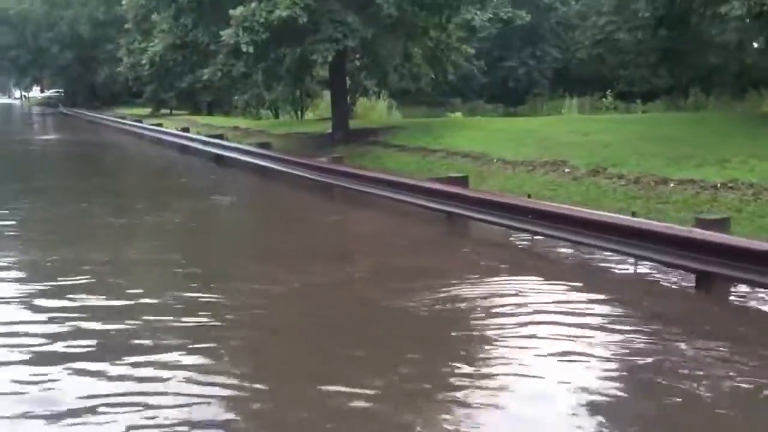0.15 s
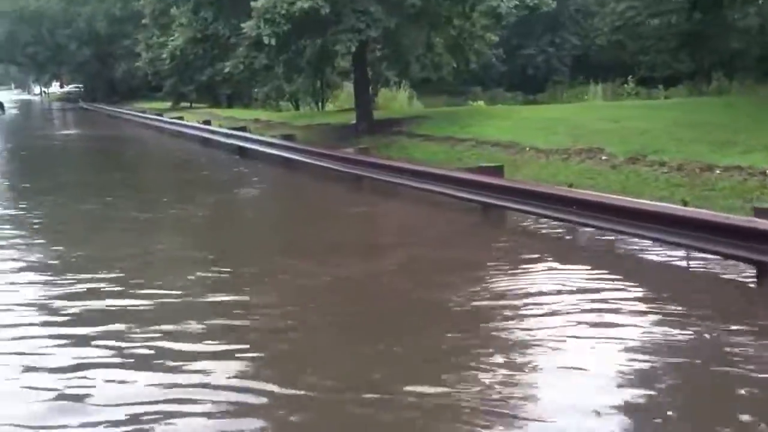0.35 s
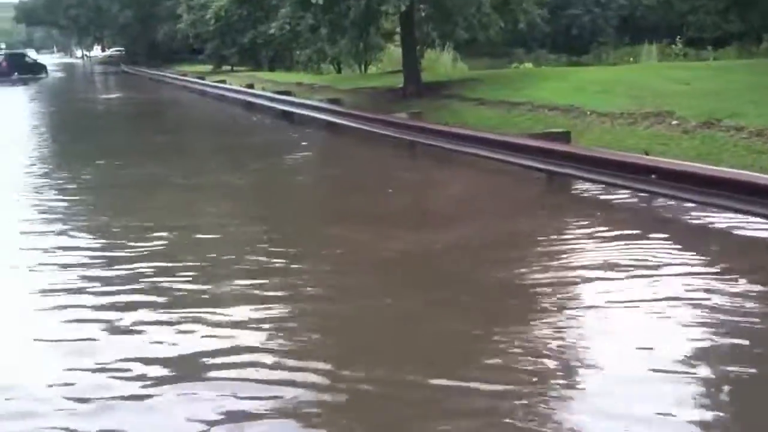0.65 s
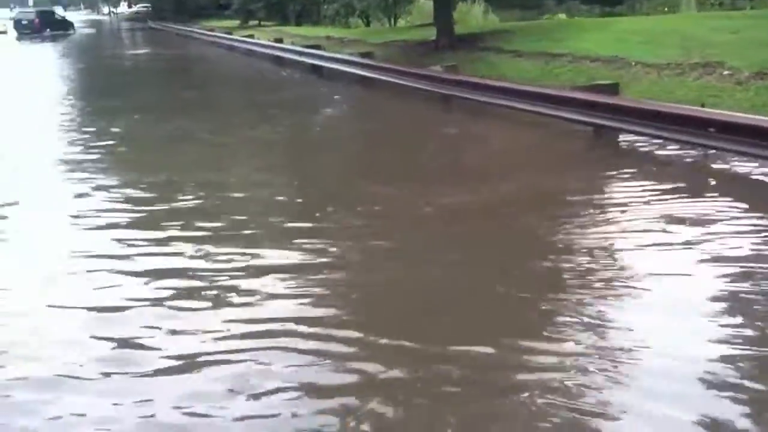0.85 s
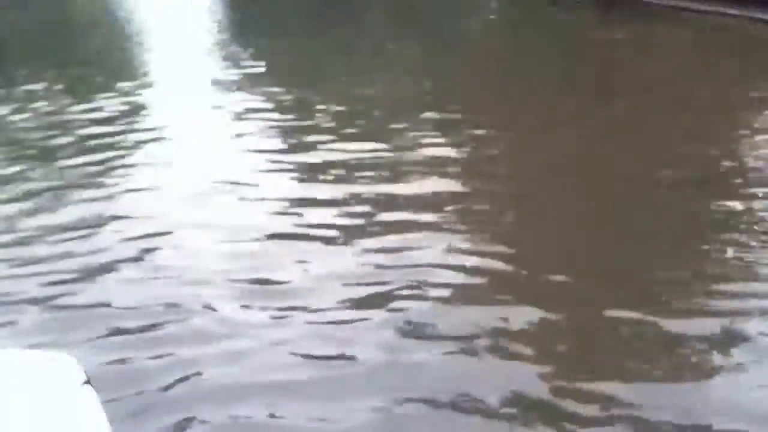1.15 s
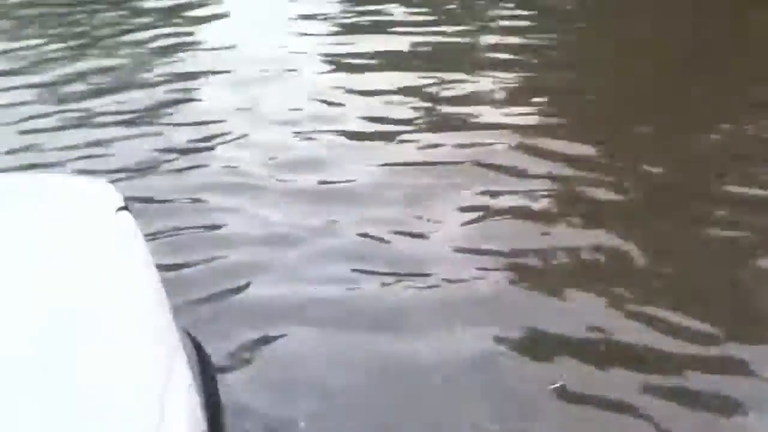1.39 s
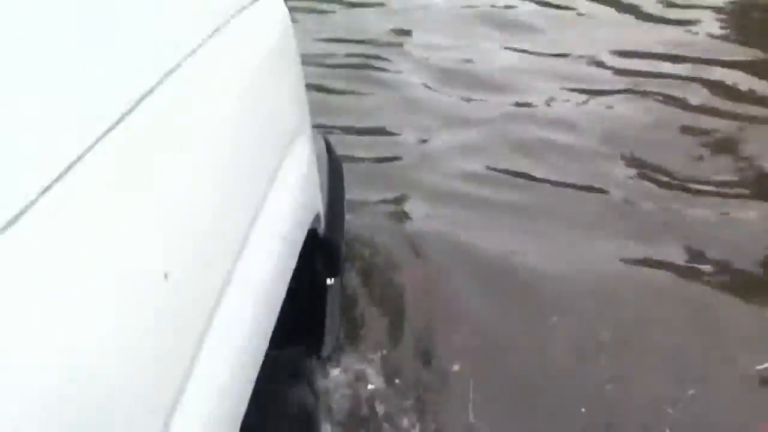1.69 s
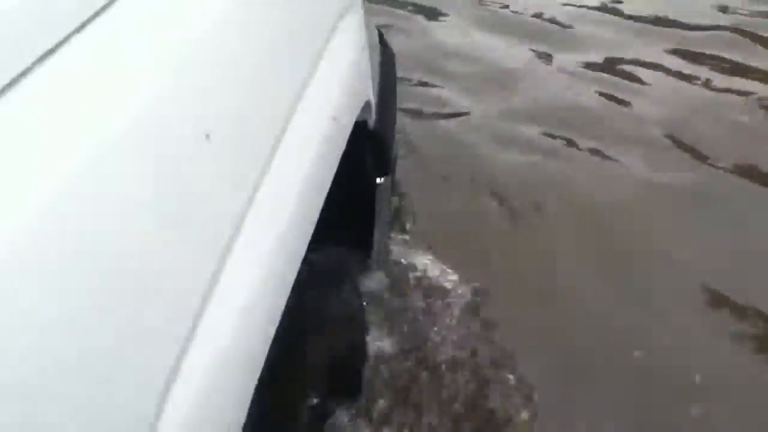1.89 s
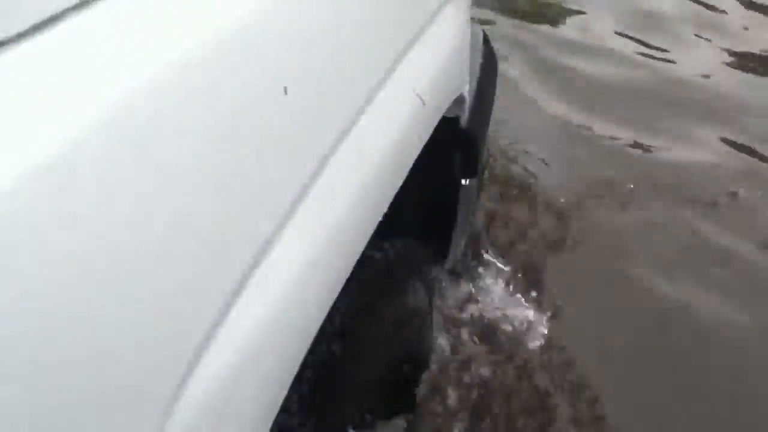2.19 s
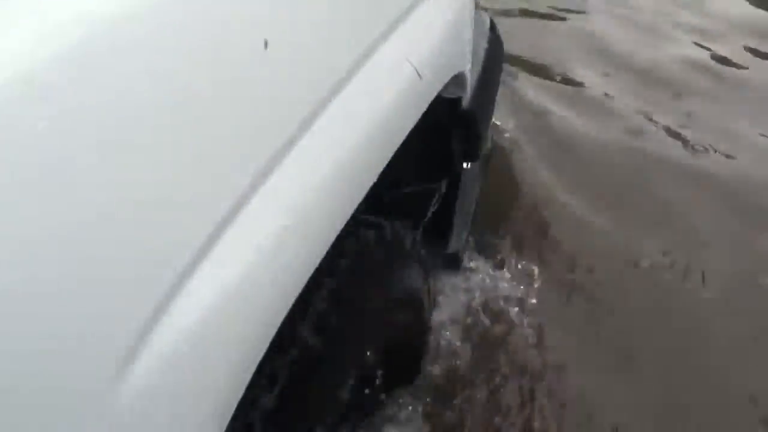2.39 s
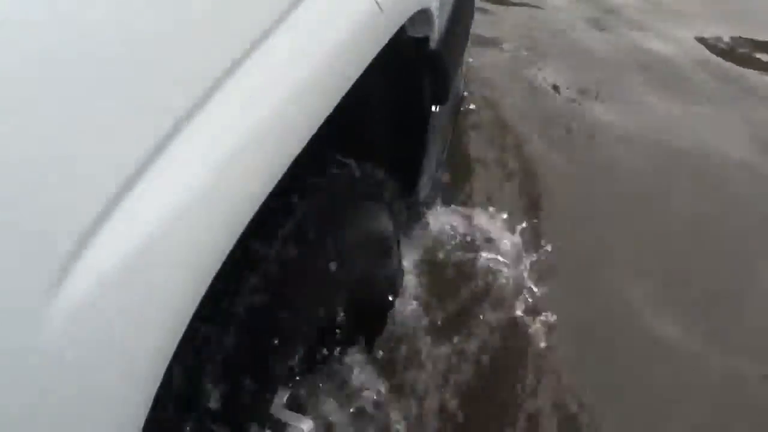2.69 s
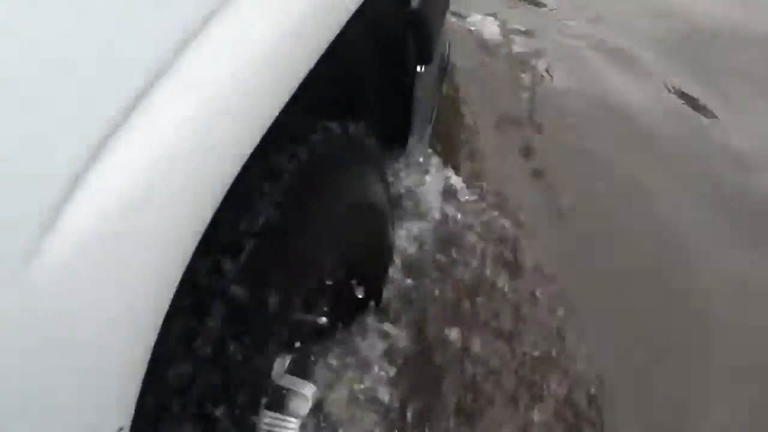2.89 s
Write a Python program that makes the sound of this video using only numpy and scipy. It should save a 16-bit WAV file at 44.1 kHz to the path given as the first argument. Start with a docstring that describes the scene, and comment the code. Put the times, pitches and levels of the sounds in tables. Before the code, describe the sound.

Water rushes softly past a car wading through floodwater, with fine crackling spray, small bubbles and a low, uneven engine drone near idle. Between 0.6 and 1 s the engine picks up; the rush then swells steadily, loudest after 2 s. Crisp drop smacks cluster near 1.3, 2.1 and 2.7 s, bubbles plop throughout, and the engine climbs again after 2.5 s. Close, dry, outdoors, treble-heavy small microphone.

```python
"""A car rolls slowly through deep floodwater, heard from its side window by a small microphone.
At first the engine, a stack of sines, drones just above idle; the bow wave, bands of noise, rushes softly.
Spray crackles as ringing clicks; for about two seconds small bubbles ring as rising sines.
Drops smack as noise bursts and large bubbles plop all along. The engine speeds up between 0.6 and 1 s.
The rush swells from then on, and the engine speeds up again after 2.5 s."""
import sys
import numpy as np
from scipy import signal
from scipy.io import wavfile

SR = 44100
rng = np.random.default_rng(int(sys.argv[2]) if len(sys.argv) > 2 else 0)


def digitize_waveform(pressure):
    """Quantize a signal to 16-bit integers and store it at the path in sys.argv[1].

    Rows of a 2-D input are taken as channels; values are limited to [-1, 1].
    """
    field = np.atleast_2d(pressure).T
    bounded = np.clip(field, -1, 1)
    quanta = np.round(bounded * 32767).astype(np.int16)
    wavfile.write(sys.argv[1], SR, quanta)


def invert_db(level):
    """Linear amplitude ratio for a level in decibels (20 dB per decade), elementwise."""
    return 10 ** (np.asarray(level, dtype=float) / 20)


N = 134505

# how the engine runs: time_s, working_cycles_per_s, load_db, throttle (0 idling, 1 pulling, 2 revving)
ENGINE_RUN = [(0, 5.76, -3.6, 0), (.19, 5.863, -3.6, 0), (.38, 5.9, -3.7, 0), (.57, 5.78, -3.8, 0),
              (.76, 6.034, -2.8, .3), (.95, 6.275, -1.0, 1), (1.14, 6.257, -.8, 1), (1.33, 6.265, -.5, 1),
              (1.52, 6.319, -.2, 1), (1.71, 6.425, 0, 1), (1.9, 6.346, .2, 1), (2.09, 6.396, .4, 1),
              (2.28, 6.47, .6, 1), (2.47, 6.526, .9, 1.2), (2.66, 6.795, 1.5, 2), (2.85, 6.985, 2.7, 2),
              (3.04, 7.012, 3.9, 2)]
# strength of each multiple of the cycle, from uneven firing: multiple, idling_db, pulling_db, revving_db
FIRING_MULTIPLES = [(12, -10.5, -2.5, .5), (15, -2.5, -11, -10), (17, -9, -3, 5), (18, 12.6, 12.6, 10.5),
                    (19, -2, -4.5, -4), (20, -6, -8, -6), (21, 0, 6, 5.5), (22, -1, -4, -2.5),
                    (23, 10.8, 11, 10), (24, 5, 0, 0), (25, 2, 3.5, 4), (26, 2.5, 5, -5), (27, 0, 2.5, 6),
                    (28, 1, .5, -5), (29, -5, -1, 2), (30, 3, -3.5, -5), (31, -10, -11, -3.5),
                    (32, -13, 1.5, 2.5), (33, 1.5, 3.5, -1), (34, 0, -4, -10), (35, -10, -6, -11),
                    (36, 4, -5, -6), (37, -10, -5.8, -5), (39, .4, .4, -3), (41, 1.7, 1.7, 0),
                    (43, 4.4, 4.4, 4.4)]
# seven uneven exhaust thumps in each cycle, which set how the multiples line up:
# idling_place (share of the cycle), idling_strength (ratio), loaded_place (share), loaded_strength (ratio)
EXHAUST_THUMPS = [(.0135, .53, .0805, .98), (.1275, .81, .169, .76), (.3651, .9, .4028, .52),
                  (.5305, .9, .7112, .97), (.5545, .4, .7363, .68), (.7143, .7, .879, .61),
                  (.8935, .61, .9703, .71)]
# response of exhaust and car body: pitch_hz, level_db
EXHAUST_RESPONSE = [(65, -51), (85, -62), (105, -56), (120, -64), (132, -67.5), (144, -50), (160, -48),
                    (180, -55.5), (195, -45), (208, -45.5), (220, -55), (235, -60.5), (300, -70)]
WAVER_DB, WAVER_RAD, WAVER_HZ = .7, .1, 1.5  # engine waver: level, phase, speed

# drops that smack close by: start_s, level_db, centre_hz, fade_s (time to fall 60 dB)
DROP_SMACKS = [(.1101, -49, 8000, .02), (.12, -35.5, 7400, .012), (.129, -40, 8500, .015),
               (.134, -37.5, 4900, .012), (0.2688, -33.5, 8500, .008), (.369, -44, 8500, .008),
               (0.376, -34, 9500, .008), (0.4504, -37, 8500, .008), (.7935, -34.5, 9000, 0.0087),
               (0.8348, -34, 8500, .008), (1.1892, -31, 9800, 0.0095), (1.288, -40, 8500, .005),
               (1.2937, -28.5, 9050, 0.012), (1.362, -27, 9000, .004), (1.3633, -37, 8500, 0.011),
               (1.3717, -32, 5940, 0.021), (1.398, -30, 8500, 0.0046), (1.7594, -30, 8500, 0.0088),
               (1.784, -30, 9500, .008), (2.0168, -34, 8500, .015), (2.067, -30, 8000, .012),
               (2.1082, -28, 9000, 0.0064), (2.114, -33, 9500, .006), (2.119, -30, 8500, 0.0064),
               (2.1355, -28, 8500, 0.0094), (2.1415, -32, 10500, .008), (2.147, -40, 8000, .008),
               (2.2814, -36, 9500, .008), (2.3334, -29.5, 8500, 0.011), (2.605, -29, 8300, .008),
               (2.613, -30, 9000, .01), (2.653, -32, 8000, .006), (2.667, -21.5, 8900, .009),
               (2.6943, -31, 7800, .006), (2.742, -31, 8500, .008)]
DROP_SPAN = 1.42  # ratio from the centre to either edge of a smack's band
# large bubbles that plop: start_s, level_db, pitch_hz (at the start)
LARGE_BUBBLES = [(0.11, -40, 2230), (.315, -46, 638), (0.953, -46, 1370), (.968, -45, 1510),
                 (1.155, -45.5, 704), (1.376, -42.5, 802), (1.957, -39, 693), (2.096, -44, 692),
                 (1.962, -38.5, 498), (2.015, -44, 1470), (2.169, -40, 2570), (2.246, -38.5, 1780),
                 (2.33, -40, 2650), (2.412, -40, 398), (2.428, -37, 3850), (1.866, -45, 3600),
                 (2.23, -40.5, 3400), (2.63, -41.5, 503), (2.746, -35, 421), (2.805, -47, 2600),
                 (2.981, -38.5, 1196)]
PLOP_CYCLES = 52.0  # length of a plop, in cycles of its starting pitch

# churn of the water at the wheel: time_s, rush_db, treble_db (above or below the rush)
WHEEL_CHURN = [(0, -52, 2), (.2, -56, 3), (.5, -54, 2.5), (.8, -53.5, 1), (1.1, -51.5, 1.5),
               (1.35, -50.5, 1), (1.6, -49.5, 2.5), (1.85, -47.5, 1), (2.05, -45.5, 1), (2.2, -45.5, -1.5),
               (2.35, -44.5, -1), (2.5, -45, -1), (2.68, -43, -4), (2.85, -45.5, 2), (3.05, -42.5, -2.5)]
SPRAY_PER_S, SPRAY_DB, SPRAY_SIZES_DB = 2500, -8, 5  # rate before clumping, level, spread of sizes
SPRAY_CLUMP_DB, SPRAY_CYCLES = 5, 2.94  # how far the rate swings, length of each ring
BUBBLES_PER_S, BUBBLES_DB, BUBBLE_CYCLES = 500, -6.5, 21.6
BUBBLE_RISE = 0.2  # a bubble ends higher in pitch by twice this share

# tone of the bow wave's rush: pitch_hz, level_db (for equal widths in Hz)
RUSH_TONE = [(25, -34), (55, -25), (90, -25), (150, 3), (200, -2), (240, -6.5), (280, -8.5), (400, -8.5),
             (650, -10), (1060, -14), (1660, -18.5), (2350, -19), (3300, -24.5), (6000, -24), (9000, -27.5),
             (15000, -33.5)]
# steady noise of fan, belts and road under the bonnet: pitch_hz, level_db (same scale, rush at 0 dB)
BAY_TONE = [(25, -80), (55, -70), (90, -56), (140, -52), (200, -49.5), (250, -49.5), (320, -54.5),
            (450, -76), (900, -82), (2300, -74), (4000, -77.5), (15000, -106)]
RUSH_DB, TREBLE_FROM_HZ = 22, 8700

MIC_PEAK_HZ, MIC_WIDTH_HZ, MIC_PEAK_DB, MIC_TOP_HZ = 8490, 1440, 12.5, 11300


def rms_one(x):
    """Scales a sound to rms 1."""
    return x / np.sqrt(np.mean(x ** 2) + 1e-20)


def in_time(rows):
    """Reads the columns of a time table at every sample."""
    s, *columns = np.transpose(rows)
    return [np.interp(np.arange(N) / SR, s, column) for column in columns]


def at_hz(points, hz):
    """Reads a spectrum on a log-frequency axis."""
    point_hz, point_db = np.transpose(points)
    return np.interp(np.log(hz), np.log(point_hz), point_db)


def drift(hz):
    """Slow random wandering with spread 1: noise smoothed above hz, drawn at every 40th sample."""
    r = np.exp(-80 * np.pi * hz / SR)
    noise = rng.standard_normal(N // 40 + 2002)
    slow = signal.lfilter([1], [1, -2 * r, r * r], noise)[2000:]
    return np.interp(np.arange(N) / 40, np.arange(len(slow)), rms_one(slow - slow.mean()))


def ring(clicks, hz, t60):
    """Each unit click sets off a sine of height 1 that falls 60 dB in t60 seconds."""
    r = invert_db(-60 / (t60 * SR))
    w = 2 * np.pi * hz / SR
    return signal.lfilter([0, np.sin(w)], [1, -2 * r * np.cos(w), r * r], clicks + 1e-18)


def add(out, s, sound):
    """Mixes a short sound in at time s."""
    i = int(s * SR)
    out[i:i + len(sound)] += sound[:N - i]


def bubble(hz, cycles):
    """A bubble sings a soft-edged sine that rises in pitch while it dies."""
    turns = np.arange(int(cycles / hz * SR)) * hz / SR
    onset = 1 - np.exp(-turns / 0.24)
    fade = invert_db(-60 * turns / cycles)
    return onset * fade * np.sin(2 * np.pi * turns * (1 + BUBBLE_RISE * turns / cycles))


def engine():
    """Uneven firing makes sines at multiples of the cycle; the exhaust colours them and they waver."""
    rate, load_db, throttle = in_time(ENGINE_RUN)
    cycle = 2 * np.pi * np.cumsum(rate) / SR
    loaded = np.minimum(throttle, 1)
    columns = np.transpose(EXHAUST_THUMPS)
    places, strengths = columns[0::2], columns[1::2]
    out = 0
    for k, *state_db in FIRING_MULTIPLES:
        # the thumps' phase at this multiple, turning from idling to pulling the short way round
        idling, pulling = np.angle(np.sum(strengths * np.exp(-2j * np.pi * k * places), axis=1))
        lined_up = idling + loaded * np.angle(np.exp(1j * (pulling - idling)))
        firing_db = np.interp(throttle, range(3), state_db) + load_db
        level = invert_db(firing_db + at_hz(EXHAUST_RESPONSE, k * rate) + WAVER_DB * drift(WAVER_HZ))
        phase = k * cycle + lined_up + WAVER_RAD * drift(WAVER_HZ)
        out = out - np.sqrt(2) * level * np.sin(phase)
    return out


def drops():
    """Each smack is a burst of noise around its own pitch that swells at once and dies in milliseconds."""
    out, age = np.zeros(N), np.arange(SR // 40) / SR
    noises = rng.standard_normal((len(DROP_SMACKS), len(age)))
    for (s, db, hz, t60), noise in zip(DROP_SMACKS, noises):
        envelope = invert_db(-60 * age / t60) * (1 - np.exp(-age / .0002))
        burst = envelope * np.tanh(3 * noise)
        band = signal.butter(2, [hz / DROP_SPAN, hz * DROP_SPAN], "band", fs=SR, output="sos")
        burst = signal.sosfilt(band, burst)
        # set lower here, as the microphone lifts this treble
        add(out, s, invert_db(db - MIC_PEAK_DB + 3) * burst / np.abs(burst).max())
    return out


def plops():
    """Single large bubbles ring for more cycles than the small ones."""
    out = np.zeros(N)
    for s, db, hz in LARGE_BUBBLES:
        add(out, s, invert_db(db) * bubble(hz, PLOP_CYCLES))
    return out


def spray():
    """Clumps of tiny droplets burst as clicks that ring for a few cycles."""
    sizes = invert_db(SPRAY_SIZES_DB * np.minimum(rng.exponential(1, N), 4.)) * rng.choice([-1, 1], N)
    clumps = invert_db(SPRAY_CLUMP_DB * (.6 * drift(14.) + drift(40.)))
    born = rng.random(N) < SPRAY_PER_S * clumps / SR
    pitches = np.geomspace(1800, 14000, 16)
    dealt = rng.integers(0, 16, N)  # which pitch each droplet gets
    rings = [ring(sizes * born * (dealt == k), hz, SPRAY_CYCLES / hz) for k, hz in enumerate(pitches)]
    return rms_one(sum(rings))


def bubbles():
    """Air folded under by the wave rings at random, at pitches starting over almost four octaves."""
    out = np.zeros(N)
    draws = rng.random((1000, 3))  # 1000 bubbles last about two seconds
    times = np.cumsum(-np.log(draws[:, 0])) / BUBBLES_PER_S
    for s, (_, size, pitch) in zip(times[times < N / SR], draws):
        hz = 330 * 13. ** pitch
        # a few are much louder; higher ones are softer
        db = 6.1 * min(-np.log(size), 2.5) - 2.3 * np.log2(hz / 330)
        add(out, s, invert_db(db) * bubble(hz, BUBBLE_CYCLES))
    return rms_one(out)


def rush(churn_db, treble_db, shared_db, own_db):
    """Third-octave noise bands: the treble surges together, each flickers, over a steady engine bay."""
    surge = .4 * drift(9.) + .7 * drift(25.)
    edges = 25 * 2 ** np.arange(0, 9.4, 1 / 3)
    white = rng.standard_normal((2, N + SR // 2))  # neighbouring bands take different noises
    out = 0
    for k, (low, high) in enumerate(zip(edges, edges[1:])):
        sos = signal.butter(2, [low, high], "band", fs=SR, output="sos")
        band = signal.sosfilt(sos, white[k % 2])[-N:]
        hz = np.sqrt(low * high)
        bright = 1 / (1 + (TREBLE_FROM_HZ / hz) ** 2)  # share of the treble changes felt here
        wave_db = churn_db + at_hz(RUSH_TONE, hz) + bright * (treble_db + shared_db * surge)
        wave = invert_db(wave_db + own_db * drift(27.4))
        bay = invert_db(at_hz(BAY_TONE, hz))
        out = out + invert_db(RUSH_DB) * band * np.hypot(wave, bay)
    return out


def scene():
    """Mixes engine and water at one point in the open air, without echoes."""
    churn_db, treble_db = in_time(WHEEL_CHURN)
    grains = invert_db(SPRAY_DB + treble_db) * spray() + invert_db(BUBBLES_DB) * bubbles()
    water = rush(churn_db, treble_db, shared_db=0.5, own_db=1.96) + invert_db(churn_db) * grains
    return (engine() + drops() + plops() + water)[None]


def top_cut(x):
    """Nothing passes above the cut-off."""
    return signal.sosfilt(signal.butter(12, 15600, fs=SR, output="sos"), x)


def record(dry):
    """The microphone port rings in the treble and falls off steeply above."""
    r, w = np.exp(-np.pi * MIC_WIDTH_HZ / SR), 2 * np.pi * MIC_PEAK_HZ / SR
    port = signal.lfilter([(1 - r * r) / 2, 0, (r * r - 1) / 2], [1, -2 * r * np.cos(w), r * r], dry)
    peaked = dry + (invert_db(MIC_PEAK_DB) - 1) * port
    mix = signal.sosfilt(signal.butter(4, MIC_TOP_HZ, fs=SR, output="sos"), peaked)
    return top_cut(mix)


dry = scene()
out = record(dry)
digitize_waveform(out)
```